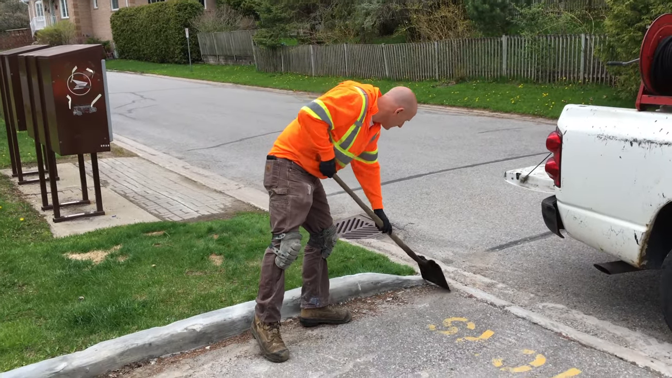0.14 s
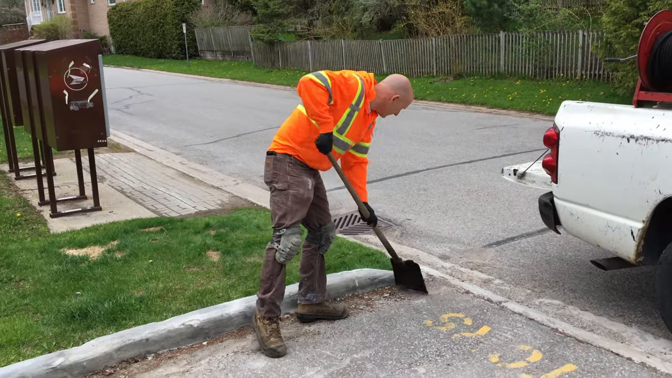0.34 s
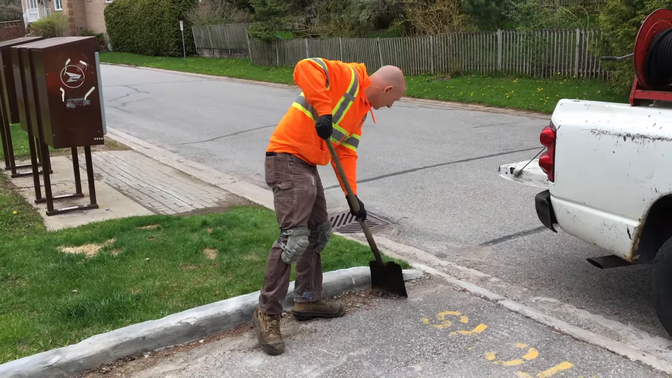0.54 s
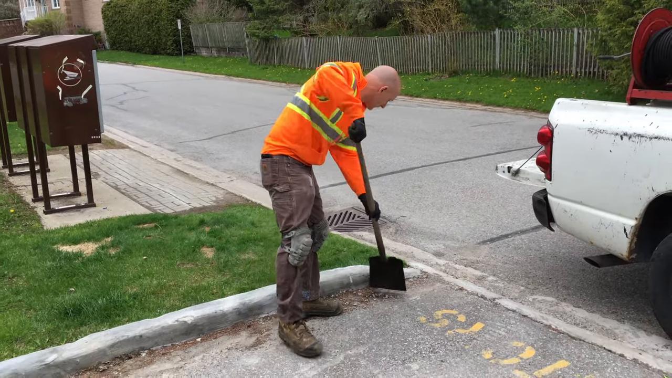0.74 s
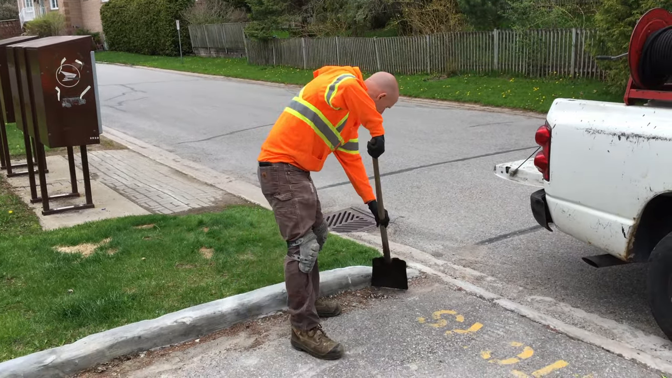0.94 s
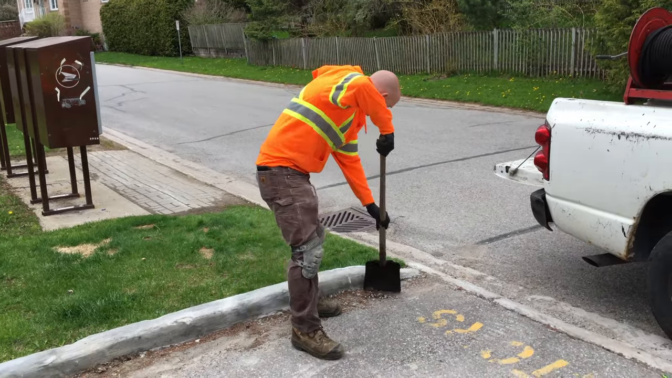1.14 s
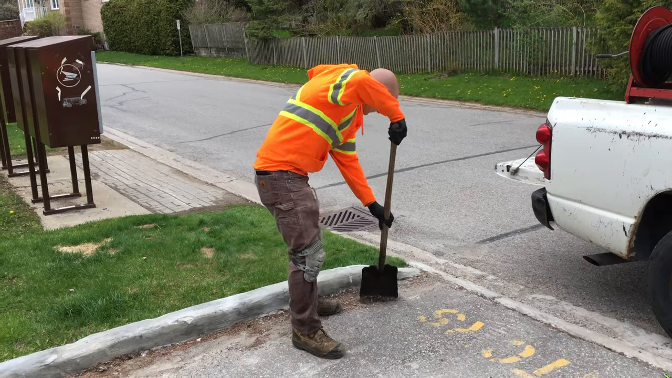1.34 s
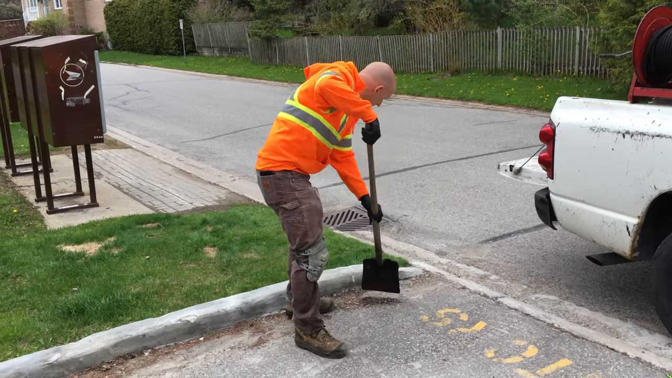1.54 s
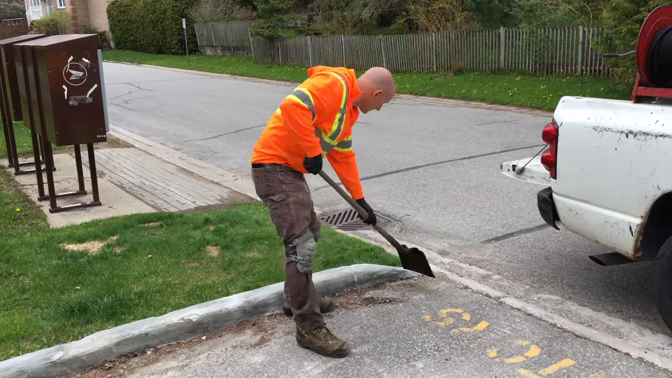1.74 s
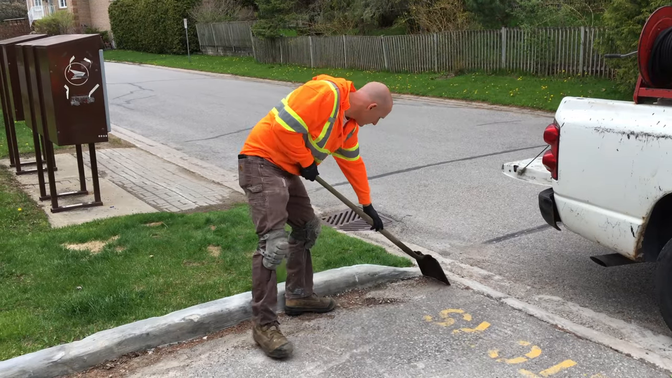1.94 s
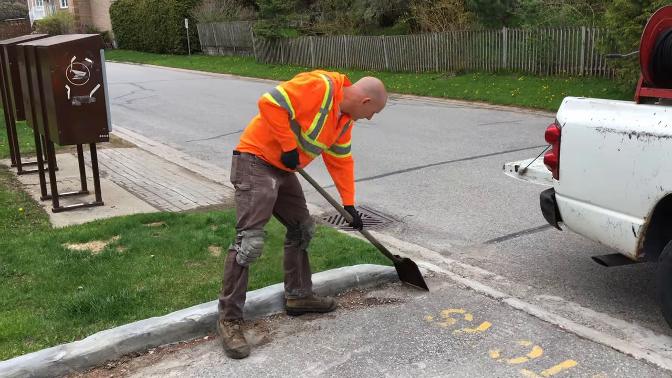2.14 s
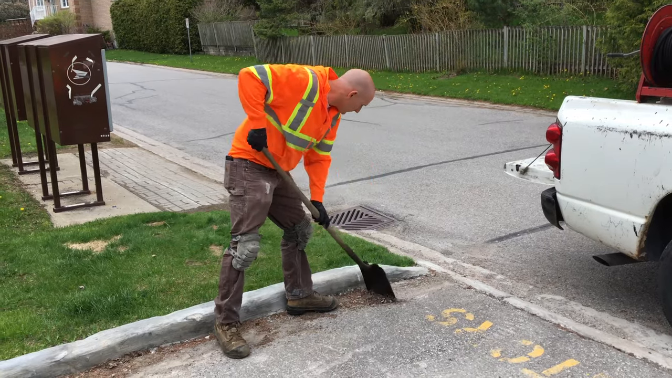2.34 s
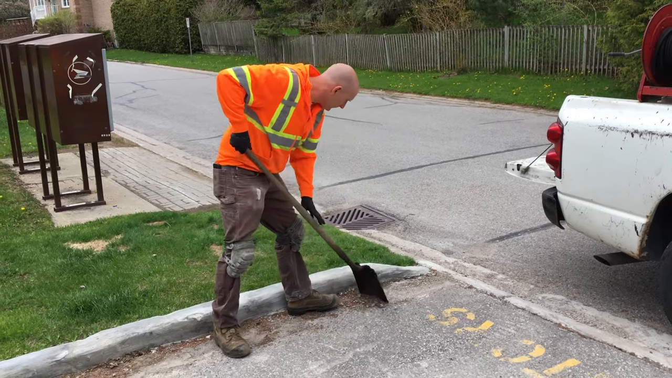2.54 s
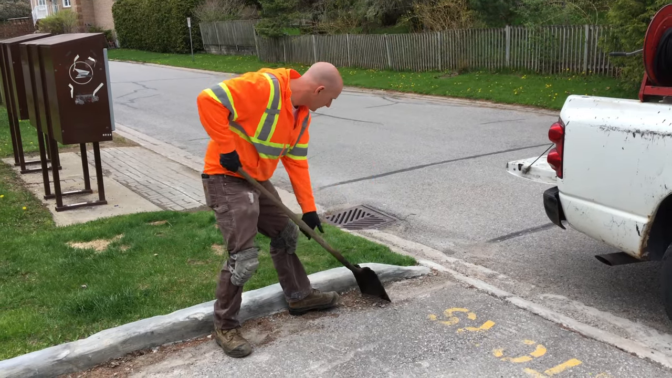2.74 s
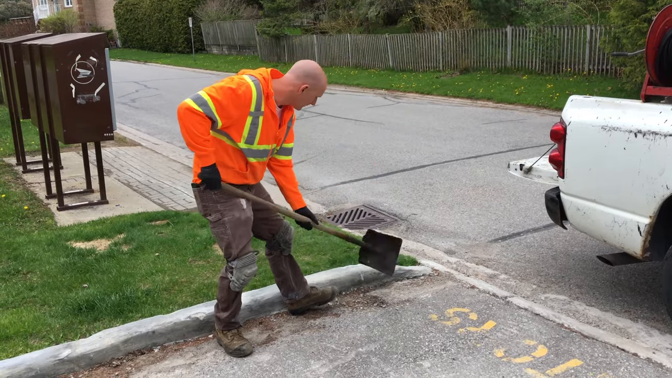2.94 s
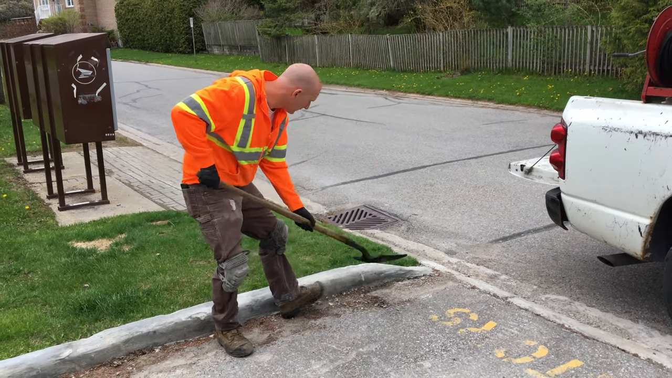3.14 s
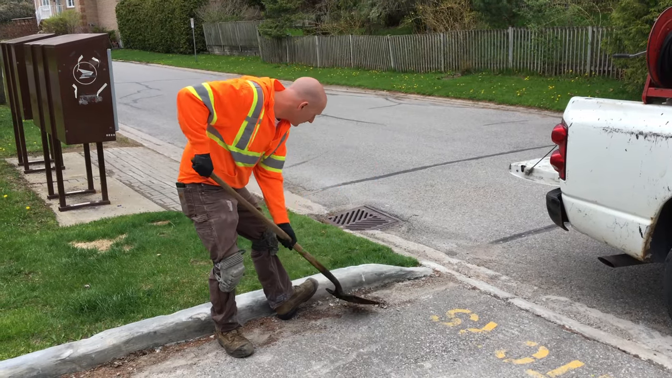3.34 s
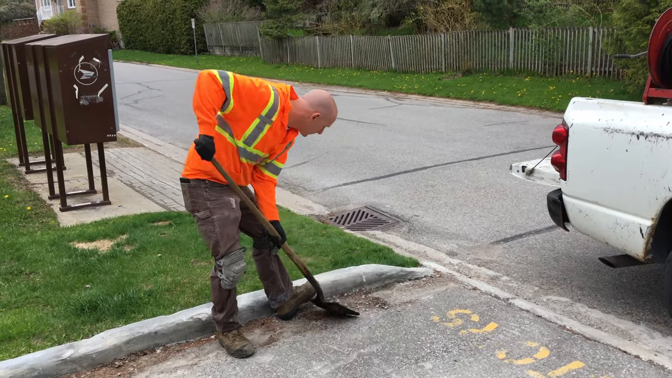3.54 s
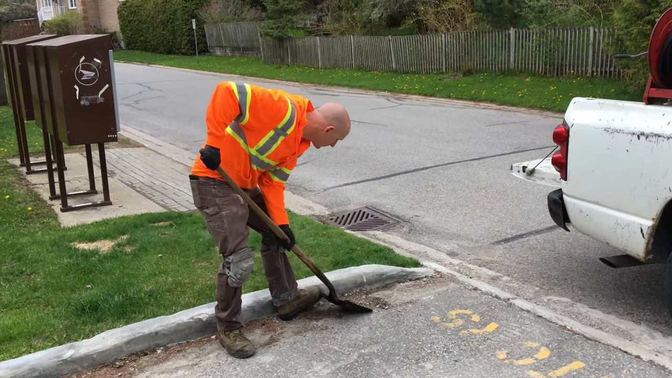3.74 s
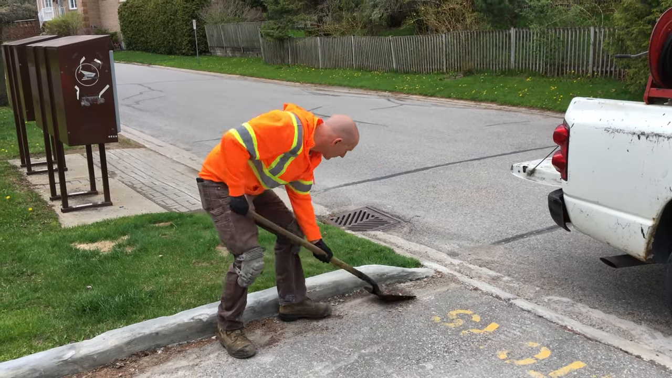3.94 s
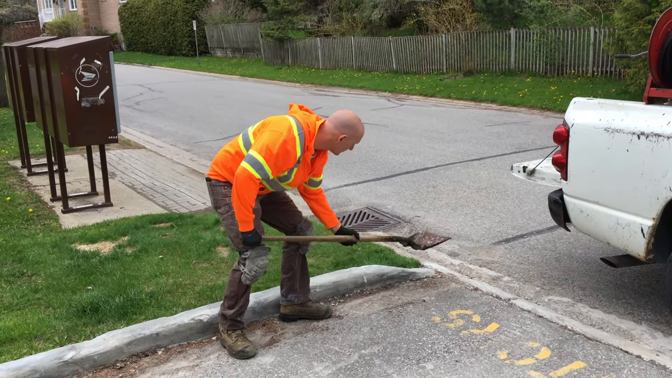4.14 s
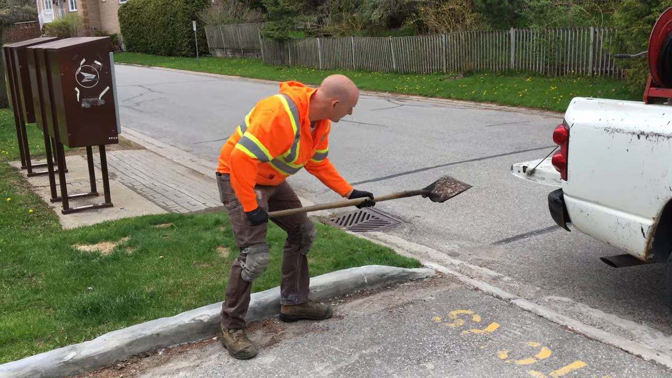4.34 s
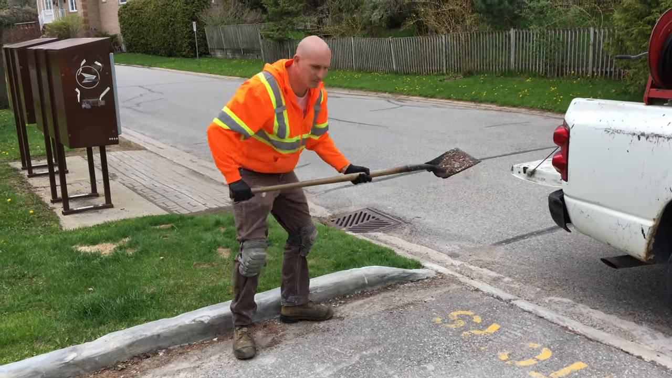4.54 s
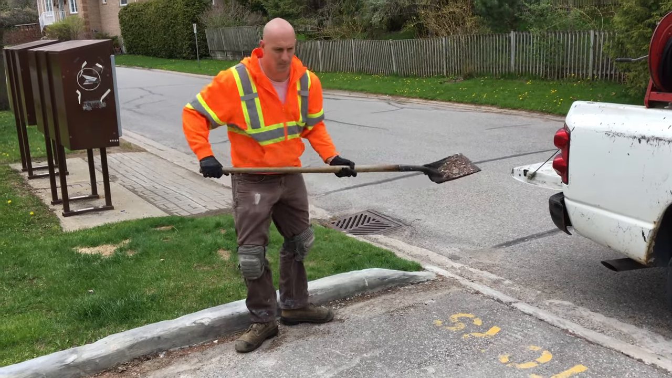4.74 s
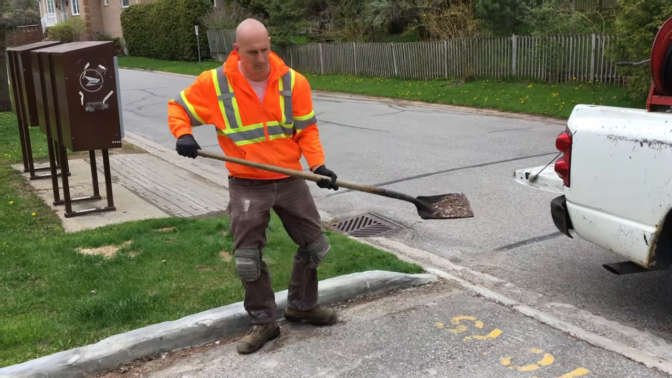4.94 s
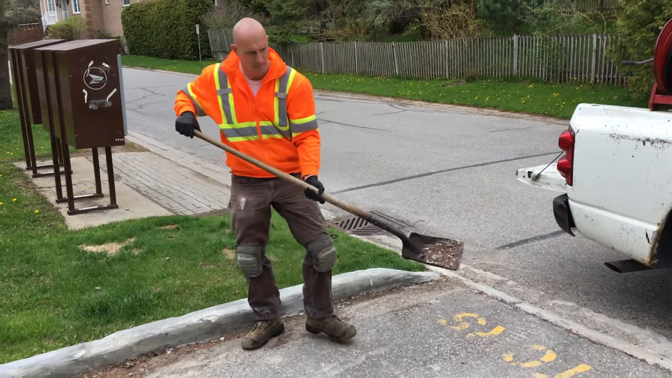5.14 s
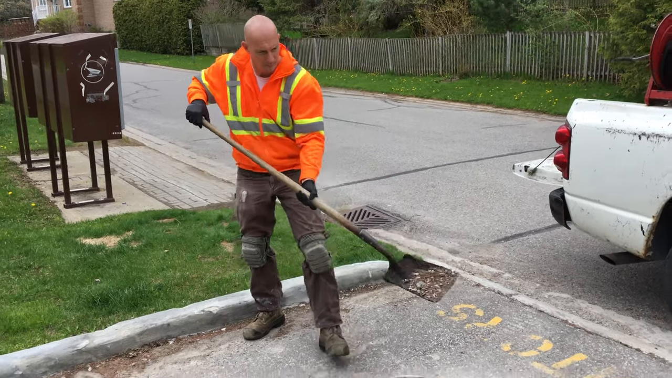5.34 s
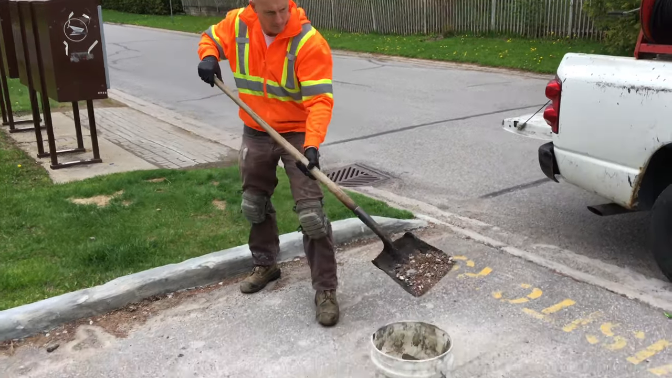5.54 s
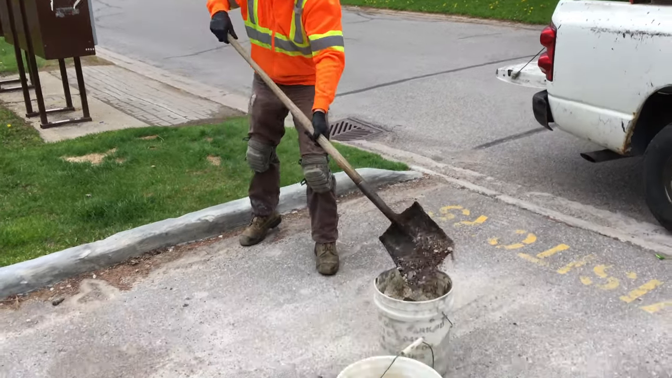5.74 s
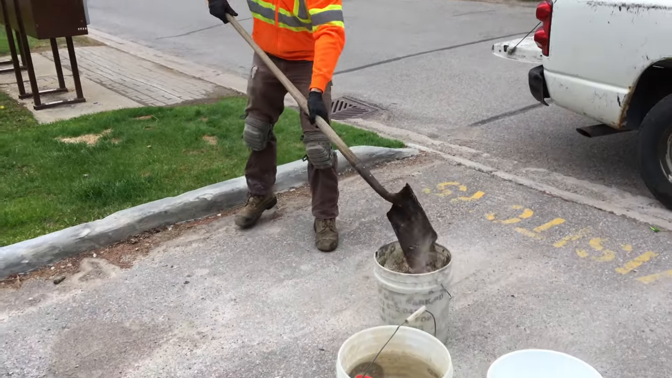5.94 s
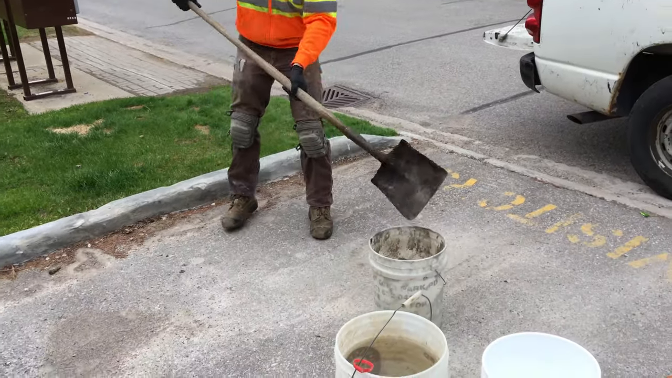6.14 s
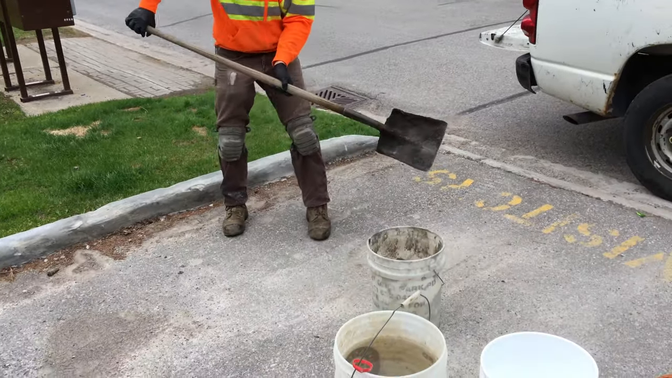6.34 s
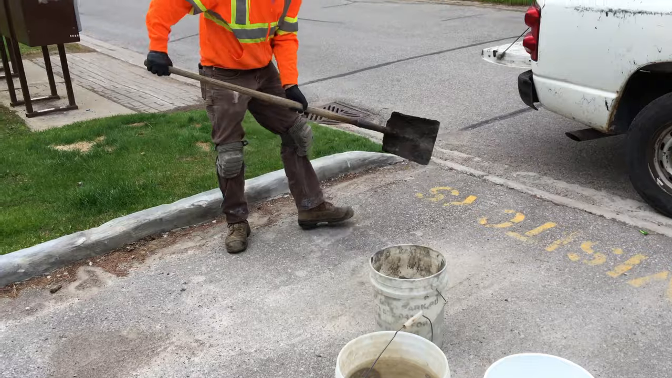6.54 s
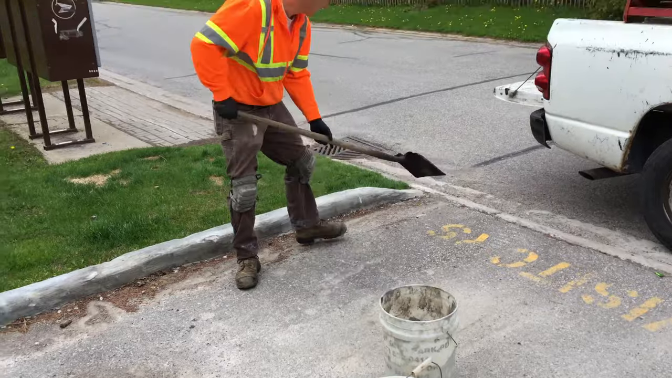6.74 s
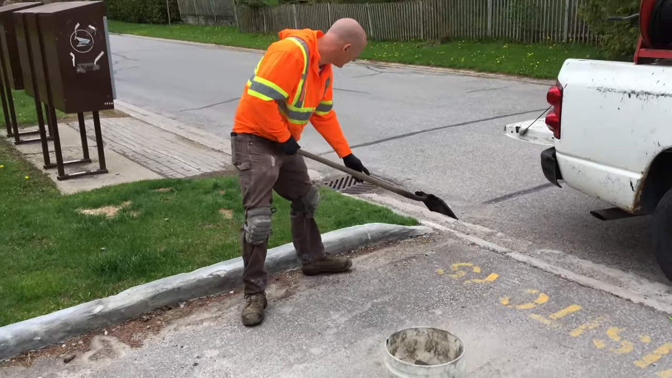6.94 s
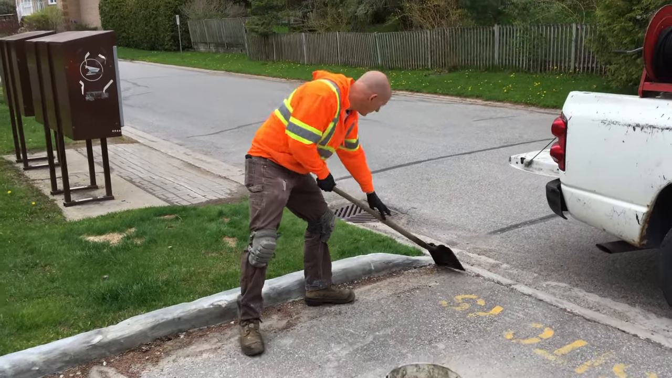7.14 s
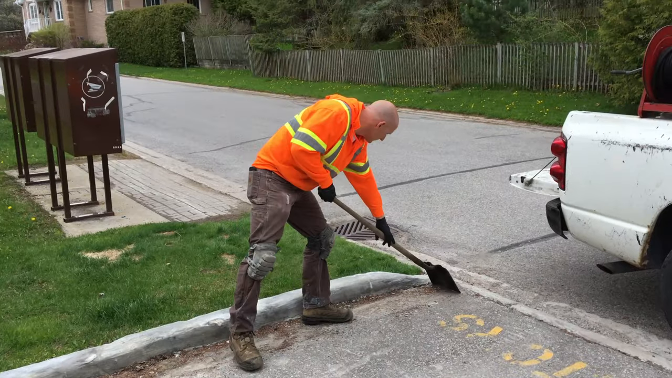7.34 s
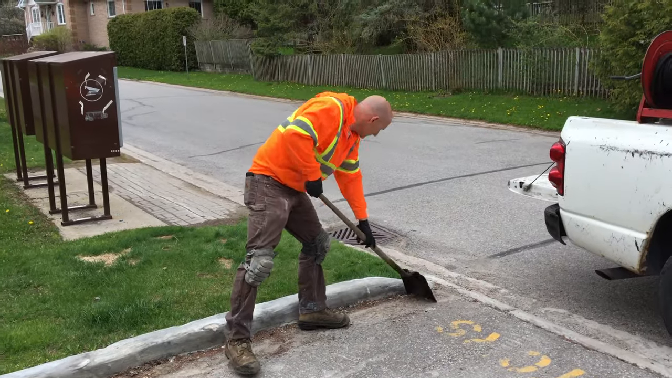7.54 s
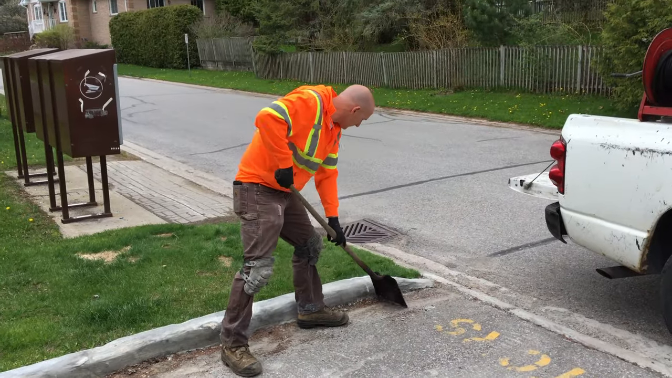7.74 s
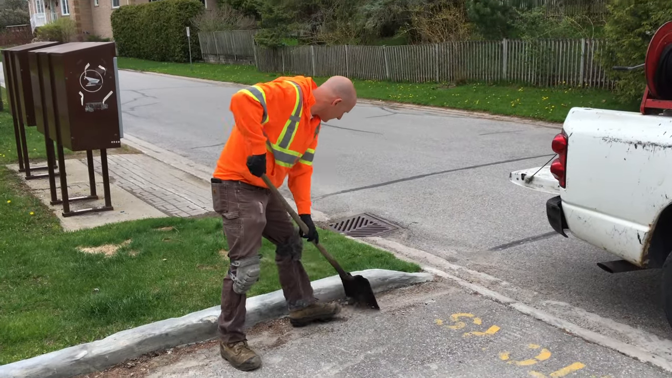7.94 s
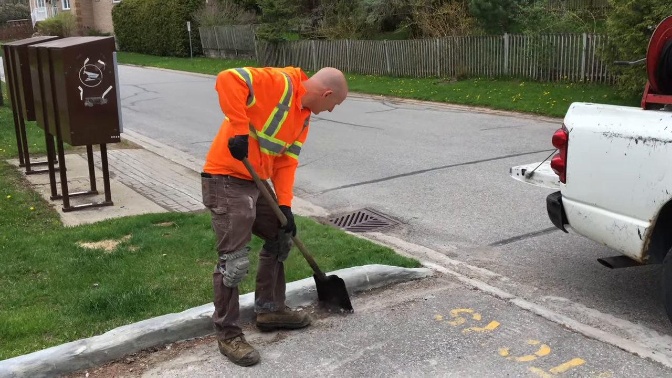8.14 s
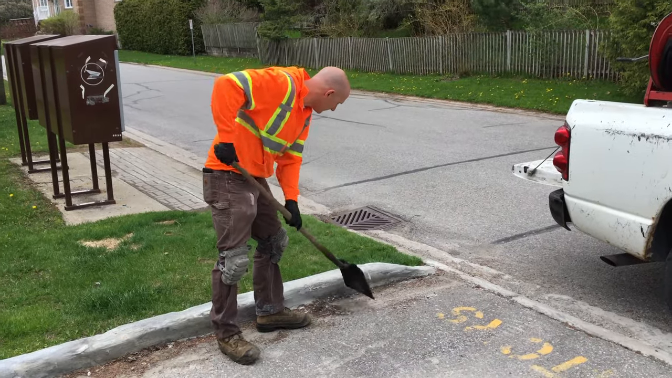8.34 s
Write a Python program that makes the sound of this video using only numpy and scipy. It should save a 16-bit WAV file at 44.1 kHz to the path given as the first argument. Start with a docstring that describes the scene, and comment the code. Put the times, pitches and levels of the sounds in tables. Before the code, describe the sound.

Close, dry outdoor street sound in mono: a steel shovel makes three rough drags over gritty asphalt, with a brief touch between the first two, clanking on stones. Wind buffets the microphone, the blade shoves under the dirt in a sharp crunchy scoop, boots tick on pebbles, then the load hisses and thumps into a plastic bucket. Faint birds chirp; one longer, softer scrape ends it.

```python
"""Outdoors, on a street: a steel shovel drags grit over asphalt four times, with one brief extra touch.
After three drags it scoops; the load slides into a plastic bucket before the last drag.
The edge catches and slips on stones: pulse trains and noise bursts shake shaft, blade and cracking grains.
Dirt drives plastic modes and an air boom; boots and pebbles tick as short noise bursts.
Wind is gusted noise, far birds are swept sines, and echoes are sparse decaying taps; one microphone."""
import sys
import numpy as np
from scipy import signal
from scipy.io import wavfile
from scipy.ndimage import uniform_filter1d

SR = 44100
rng = np.random.default_rng(int(sys.argv[2]) if len(sys.argv) > 2 else 0)


def wrap_up_sound(samples):
    """Save the sound to the file named by the first command line argument, as 16-bit audio."""
    columns = np.atleast_2d(samples).T
    # keep every value between -1 and 1, then stretch to whole-number steps
    tamed = np.clip(columns, -1, 1)
    steps = np.round(tamed * 32767).astype(np.int16)
    wavfile.write(sys.argv[1], SR, steps)


N = 370440
TIME = np.arange(N) / SR
HZ = np.fft.rfftfreq(8192, 1 / SR)


# blade dragged on its edge: (start [s], push [s], hold [s], release [s], pressure [dB],
# first touch [dB re pressure], sag over hold [dB], judder [dB re pressure], crushing [dB re pressure])
DRAG_STROKES = [(0.086, 0.24, 0.25, 0.13, -16.5, -12, -6.5, -6, -5),
                (0.914, 0.019, 0.041, 0.022, -25, -0.5, -1, -8.5, -7.5),
                (1.105, 0.17, 0.19, 0.094, -17, -21, -8, -5.5, -3.5),
                (2.023, .24, .28, 0.039, -15, -13.5, -8, -8.5, -4),
                (7.325, 0.24, 0.66, 0.1, -20.5, -22, -2, -4, -1)]
# blade lands or jumps off a stone: (time [s], ring [dB], thud [dB], crack [dB])
EDGE_KNOCKS = [(0.072, -12, -11.5, -22.5), (0.082, -35, -19, -22.5), (0.1198, -17.5, -38, -16),
               (.294, -12, -22, -22), (.311, -17, -28.5, -16), (.337, -12.5, -8, -27), (.43, -17, -27, -16),
               (.489, -12.5, -16, -15), (.94, -32, -36, -34.5), (1.051, -21.5, -22, -29.5),
               (1.226, -33, -32, -10.5), (1.249, -20, -24, -27), (1.259, -12, -33, -27),
               (1.3158, -19, -45, -10.5), (2.004, -20.5, -24, -19.5), (2.013, -19.5, -25, -32),
               (2.065, -34, -62, -19), (2.158, -8.5, -14, -14.5), (2.193, -23, -29, -18),
               (2.2178, -11, -30, -32), (2.2751, -8, -17.5, -17), (2.402, -12.5, -21, -32.5),
               (2.529, -28, -40, -15.5), (2.543, -27, -35, -14.5), (7.2501, -18, -16.5, -17),
               (7.262, -16.5, -18.5, -22.5), (7.334, -28.5, -24, -33.5), (7.619, -16, -14, -38),
               (7.673, -12.5, -16, -33), (7.851, -14.5, -24, -40)]
# broad colour of the blade on its edge: (frequency [Hz], density [dB per Hz])
EDGE_COLOUR = [(60, -24), (110, 4.5), (160, -3), (300, 5), (430, -5.5), (560, 5), (1200, 3.5), (1500, -2),
               (2050, 4.5), (3200, -2.5), (4900, -10), (6500, 2), (10500, -34), (16000, -46.5)]
# nominal modes of the steel blade, also rung by scoops(): (frequency [Hz], level [dB], t60 [s])
BLADE_MODES = [(287, -1.5, 0.023), (655.4, 3.5, 0.033), (804, -3, 0.059), (1153, -1, 0.063),
               (1242, 3, 0.067), (1447, -3, 0.023), (1777, 3.5, .06), (1928, 0, 0.072), (2055, 3.5, 0.053),
               (2167, -4, .05), (2676, -1.5, .04), (4233, 10.5, 0.055), (5730, -6, 0.033), (6900, -17, .03)]


def drags():
    """The blade scrapes on its edge: five contact spots ring with the steel modes."""
    spots = [body(EDGE_COLOUR, BLADE_MODES, ring_db=1.0) for _ in range(5)]
    return shovel(DRAG_STROKES, EDGE_KNOCKS, spots, judder_db=-4.0, ring_db=-1.45, grit_db=-1.07)


# flat blade skids on landing, touches again, is shoved under the heap in two pushes:
# (start [s], push [s], hold [s], release [s], pressure [dB],
# first touch [dB re pressure], sag over hold [dB], judder [dB re pressure], crushing [dB re pressure])
SCOOP_STROKES = [(3.529, .004, 0.027, 0.017, -27, 2, -3, -11, -13),
                 (3.667, 0.0054, 0.022, 0.033, -33, -9, -3, -9, -12.5),
                 (3.709, 0.17, 0.048, 0.14, -14, -12.5, -7, -15.5, -8.5),
                 (3.925, 0.026, 0.06, 0.027, -18, -17, -2, -30, -6.5)]
# flat of the blade strikes the road: (time [s], ring [dB], thud [dB], crack [dB])
FLAT_SLAPS = [(3.5305, -23, -44, -33), (3.554, -22.5, -46, -30.5), (3.994, -15, -46, -16.5)]
# broad colour of the blade lying flat: (frequency [Hz], density [dB per Hz])
FLAT_COLOUR = [(100, -65.5), (300, 9), (430, -11.5), (600, -1), (900, -7), (1150, 1), (1900, 1),
               (2600, -1.5), (3200, -11.5), (4900, 5), (6000, -29), (10500, -29), (13000, -25),
               (16000, -25)]


def scoops():
    """The blade skids lying flat, its modes weaker against the broad colour than on edge."""
    spots = [body(FLAT_COLOUR, BLADE_MODES, ring_db=-6) for _ in range(4)]
    return shovel(SCOOP_STROKES, FLAT_SLAPS, spots, judder_db=-3.5, ring_db=-0.2, grit_db=4.2)


# edge squeaks thinly on smooth stone: (start [s], push [s], hold [s], release [s],
# level [dB], first touch [dB re level], sag over hold [dB])
SQUEAK_STROKE = (.15, .045, .125, .07, -22.5, -12, 0)


def squeak():
    """Rapid slips sound out a narrow high band."""
    return sing(stroke(*SQUEAK_STROKE), centre_hz=12550, width_hz=1600, steady=0.05)


GROAN_DB = -12.5  # re pressure
UPRIGHT_STROKE = 2  # row of DRAG_STROKES made with the shovel upright


def groan():
    """The upright blade groans: slips sound out one low resonance."""
    pressure = stroke(*DRAG_STROKES[UPRIGHT_STROKE][:-2])
    return sing(amp(GROAN_DB) * pressure, centre_hz=602, width_hz=72, steady=0.67)


def shovel(strokes, knocks, spots, judder_db, ring_db, grit_db):
    """Slips and knocks shake the shaft, ring the blade and crush grit under the edge."""
    s, knock_db, thud_db, crack_db = np.transpose(knocks)
    pressure, judder, crush = contact(strokes, s)
    slip = slips(per_s=230, decay_s=0.0084, spread_db=1.5, steady=0.17)
    chips = slips(per_s=380, decay_s=0.0005, spread_db=2.5, steady=0.36)

    low = amp(judder_db) * judder * slip * grains(1500, 0.93)
    low += crunches(s, thud_db, decay_s=0.0035)
    mid = amp(ring_db) * pressure * slip * grains(4000, 2.3)
    mid += crunches(s, knock_db, decay_s=0.0061)
    high = amp(grit_db) * crush * np.sqrt(slip) * chips * rng.standard_normal(N)
    high += crunches(s, crack_db, decay_s=0.0047)

    shaft = unit(band(spots[0], [122, 440], "band", order=4))
    blade = [unit(band(spot, [490, 3200], "band", order=4)) for spot in spots]
    stones = [stone(uneven_db=4.0, ring_db=-7.5) for _ in range(10)]
    return through(low, shaft) + roaming(mid, blade, rate_hz=16) + roaming(high, stones, rate_hz=50)


HEAP_JUDDER_DB, HEAP_GRIT_DB = 0.5, 1.5  # growth over a stroke, as dirt piles up before the blade
CATCH_DB, CATCH_LEAD_S, CATCH_S = -1.5, 0.012, 0.009  # edge stalls on a stone just before it jumps


def contact(strokes, knock_times):
    """Pressure on the edge and the judder and crushing it drives; all three dip just before a knock."""
    pressure, judder, crush = np.zeros((3, N))
    for *push, judder_db, grit_db in strokes:
        start, push_s, hold_s = push[:3]
        force = stroke(*push)
        heap = np.clip((TIME - start) / (push_s + hold_s), 0, 1) - 0.5
        pressure += force
        judder += force * amp(judder_db + HEAP_JUDDER_DB * heap)
        crush += force * amp(grit_db + HEAP_GRIT_DB * heap)
    offsets = [(TIME - s + CATCH_LEAD_S) / CATCH_S for s in knock_times]
    caught = np.max([np.exp(-np.minimum(offset ** 2, 20)) for offset in offsets], axis=0)
    return np.array([pressure, judder, crush]) * amp(CATCH_DB * caught)


PUSH_EASE = 1.15  # above 1: force builds fast, then levels off
LIFT_DB = -31  # pressure fall per release time as the blade lifts


def stroke(start, push_s, hold_s, release_s, db, touch_db, sag_db):
    """Force of one arm stroke: builds from the first touch, sags as the arm runs out, lifts."""
    t = TIME - start
    building = np.clip(1 - t / push_s, 0, 1) ** PUSH_EASE
    tiring = np.clip((t - push_s) / hold_s, 0, 1) ** 2
    lifting = np.minimum(np.maximum(t - push_s - hold_s, 0) / release_s, 10)
    return (t >= 0) * amp(db + touch_db * building + sag_db * tiring + LIFT_DB * lifting)


def slips(per_s, decay_s, spread_db, steady):
    """Stick and slip: the edge lets go at uneven moments, each release a sharp surge that fades."""
    t = np.arange(SR // 20) / SR
    surge = evened(through(grains(per_s, spread_db) ** 2, np.exp(-t / decay_s)))
    power = abs(surge) + abs(steady)
    return np.sqrt(power / uniform_filter1d(power, size=3000))  # arm holds the mean force steady


def sing(gain, centre_hz, width_hz, steady):
    """Rapid slips lock onto one resonance of the steel: slip-gated noise through a narrow band."""
    drive = slips(per_s=300, decay_s=0.0014, spread_db=-1.5, steady=steady) * rng.standard_normal(N)
    edges_hz = [centre_hz - width_hz / 2, centre_hz + width_hz / 2]
    return gain * evened(band(drive, edges_hz, "band", order=2))


# stone being crushed, also the treble of loose_dirt(): (frequency [Hz], density [dB per Hz])
GRIT_COLOUR = [(2000, -26.5), (3300, 3.5), (4200, 0.5), (4900, -4.5), (5700, 3), (7000, 0.5), (7900, -4),
               (9300, 0), (10500, -5), (12300, -1), (14000, -6), (16000, -10.5)]


def stone(uneven_db, ring_db):
    """Every stone cracks with a colour of its own and pings briefly at three pitches."""
    crack = colour([(hz, db + uneven_db * rng.uniform(-1, 1)) for hz, db in GRIT_COLOUR])
    t = np.arange(len(crack)) / SR
    ping = sum(np.sin(2 * np.pi * hz * t) for hz in rng.uniform(3300, 9500, size=3))
    return unit(crack + amp(ring_db) * unit(ping * np.exp(-t / 0.0016)))


# load slides off as a trickle around one slump: (loudest time [s], level [dB], rise [s], fall [s])
POUR_SWELLS = [(6.02, -36, 0.16, 0.19), (6.029, -19, 0.041, 0.033)]
# sand hiss: (frequency [Hz], density [dB per Hz])
SAND_COLOUR = [(1200, 6.5), (2900, 2), (4500, -3), (7000, -2), (9000, -6.5), (13000, -1), (16000, -10)]
# dirt lands, the bulk then last crumbs: (loudest time [s], level [dB], rise [s], fall [s])
LANDING_SWELLS = [(6.045, -21, 0.028, 0.041), (6.16, -47, 0.033, 0.13)]
# stones and clods hit the bucket: (time [s], wall [dB], boom of the air inside [dB])
CLOD_HITS = [(5.908, -27, -25), (5.929, -12.5, -29), (5.946, -13, -40), (5.98, -28, -23),
             (6.0233, -8.5, -30), (6.042, -12.5, -15.5), (6.051, -11, -11), (6.069, -13.5, -18),
             (6.089, -16, -13), (6.152, -25, -22), (6.209, -37, -21.5), (6.245, -29.5, -26.5),
             (6.355, -36, -33)]
# nominal modes of plastic wall and bottom: (frequency [Hz], level [dB], t60 [s])
BUCKET_MODES = [(570, -2.5, 0.076), (724, -4.5, 0.11), (802, 0, 0.063), (906, 0, 0.069), (1330, 1, 0.08),
                (1600, -7, 0.14), (1814, -6.5, 0.12), (2220, -1.5, 0.094), (2870, -10, 0.046)]
# dull knock of the plastic: (frequency [Hz], density [dB per Hz])
PLASTIC_COLOUR = [(120, -17), (310, 5), (430, -10), (650, 13), (1400, 13.5), (2800, 0.5), (5000, -12)]
SAND_SPREAD_DB = 4


def bucket():
    """Sand hisses off the blade; dirt and stones drum on the plastic and make the air inside boom."""
    at, wall_db, boom_db = np.transpose(CLOD_HITS)
    clumps = slips(per_s=110, decay_s=0.002, spread_db=2.5, steady=0.27)
    hiss = sum(swell(*row) for row in POUR_SWELLS) * clumps * grains(14000, SAND_SPREAD_DB)
    spray = amp(-14.5) * crunches(at, wall_db, decay_s=0.0051)  # each clod bursts into sand

    blows = sum(swell(*row) for row in LANDING_SWELLS) * clumps * grains(1200, 2.0)
    blows += crunches(at, wall_db, decay_s=0.0026)
    spots = [body(PLASTIC_COLOUR, BUCKET_MODES, ring_db=-2.0) for _ in range(5)]
    walls = roaming(blows, spots, rate_hz=24)

    air, t = np.zeros(N), np.arange(SR // 2) / SR
    for start, db in zip(at, boom_db):
        hz = 207 * rng.uniform(0.866, 1.04)
        add(air, start, amp(db) * boom(t, hz, decay_s=0.018, rise_s=0.0016))
    return through(hiss + spray, colour(SAND_COLOUR)) + walls + amp(-3) * air


def boom(t, hz, decay_s, rise_s):
    """Air column of the open bucket: a sine that rises fast and decays."""
    return np.sin(2 * np.pi * hz * t) * (np.exp(-t / decay_s) - np.exp(-t / rise_s))


# boots on grit and loose pebbles: (time [s], level [dB], treble [dB re level])
DIRT_TICKS = [(1.739, -25.5, -24), (1.825, -34.5, -17), (2.747, -32, -12.5), (3.267, -31, -20),
              (4.587, -34, -16.5), (4.779, -19.5, -13.5), (4.81, -22, -21), (4.897, -28, -30),
              (4.912, -34, -20), (4.973, -27.5, -27), (4.984, -26, -24), (5.173, -36, -24),
              (5.268, -36.5, -12), (5.714, -31, -31), (6.208, -34, -1), (6.377, -38, 2), (6.407, -40, -3),
              (6.517, -31, -8.5), (6.686, -43.5, -4.5), (6.847, -33, -17), (7.147, -27.5, -16)]
# nominal tick colour: (frequency [Hz], density [dB per Hz])
TICK_COLOUR = [(200, 1), (800, 3), (1800, 8), (3000, 0.5), (9000, -32)]
# crackle of shifting sand: (frequency [Hz], density [dB per Hz])
DIRT_COLOUR = [(200, 1.5), (430, -1), (700, 3.5), (2100, -1.5), (3200, -4), (5000, -9.5), (7000, -12),
               (10000, -10.5), (13000, -10), (16000, -16.5)]
TICK_DECAY_S, SKID_DECAY_S = 0.0018, 0.013


def loose_dirt():
    """Pebbles tick and skid briefly over a fine crackle of shifting sand."""
    s, db, treble_db = np.transpose(DIRT_TICKS)
    taps = crunches(s, db, TICK_DECAY_S) + amp(-9.5) * crunches(s, db, SKID_DECAY_S)
    spots = [colour([(hz, level_db + 4 * rng.uniform(-0.45, 1)) for hz, level_db in TICK_COLOUR])
             for _ in range(4)]
    ticks = amp(-9) * roaming(taps, spots, rate_hz=10)
    ticks += amp(-1) * through(crunches(s, db + treble_db, decay_s=0.0063), colour(GRIT_COLOUR))
    crackle = shifting() * evened(grains(3000, 2.0) * amp(1.9 * wander(37)))
    return ticks + amp(-2.5) * through(crackle, colour(DIRT_COLOUR))


SETTLE_DB, SETTLE_RISE_S, SETTLE_S = -47.5, 0.016, 0.52
WALK_FROM_S, WALK_TO_S, WALK_DB = 4.5, 8.4, -57  # boots shuffle to the bucket and back


def shifting():
    """Loose-dirt motion: settles after each drag and the last scoop push, stirs under the boots."""
    lifts = [sum(row[:4]) for row in DRAG_STROKES + SCOOP_STROKES[-1:]]
    settling = np.max([swell(s, SETTLE_DB, SETTLE_RISE_S, SETTLE_S) for s in lifts], axis=0)
    walking = amp(WALK_DB) * (TIME > WALK_FROM_S) * (TIME < WALK_TO_S)
    return np.hypot(settling, walking)


# eddies hit the microphone: (loudest time [s], level [dB], length [s])
WIND_GUSTS = [(1.592, -33, 0.064), (1.867, -32, 0.03), (2.852, -37.5, 0.073), (3.146, -21, 0.046),
              (3.24, -24.5, 0.11), (3.314, -25.5, 0.061), (3.403, -27.5, 0.064), (3.48, -22.5, 0.035),
              (3.608, -23.5, 0.049), (4.228, -32, 0.032), (4.538, -29, .03), (4.594, -28.5, 0.029)]
BREEZE_DB = -46.5
GUST_RISE, GUST_FALL = 0.46, 1  # shares of a gust's length


def wind():
    """Eddies thump on the microphone; the stronger the gust, the higher they reach."""
    eddies = np.max([swell(s, db, GUST_RISE * length_s, GUST_FALL * length_s)
                     for s, db, length_s in WIND_GUSTS], axis=0)
    gust = np.hypot(amp(BREEZE_DB), eddies) * amp(2.62 * wander(30) - 1)
    # colours: (frequency [Hz], density [dB per Hz])
    rumble_colour = colour([(40, 7), (70, 4.5), (120, -4), (200, -18), (400, -30.5), (5000, -92)])
    buffet_colour = colour([(80, -3.5), (160, 3.5), (260, -3.0), (450, -19.5), (4000, -78)])
    rumble = through(rng.standard_normal(N), rumble_colour)
    buffet = through(rng.standard_normal(N), buffet_colour)
    return gust * rumble + amp(21) * gust ** 2 * buffet


# distant bird's three-note figure: (delay [s], start [Hz], end [Hz], level [dB]), before SONG_TIMES scaling
SONG_FIGURE = [(0, 2970, 3570, -5), (0.078, 4030, 4760, -2), (0.179, 5950, 4950, -0.5)]
# each time it is sung: (time [s], level [dB], pitch ratio [1])
SONG_TIMES = [(5.201, -53.5, 1.01), (5.5, -52, 1), (6.405, -52.5, 1), (6.715, -53, 1.005),
              (7.04, -53.5, 1.06)]
# single slurs from other birds: (time [s], start [Hz], end [Hz], level [dB])
BIRD_SLURS = [(0, 3680, 4250, -53.5), (2.84, 4160, 3900, -61), (4.66, 5760, 4640, -70),
              (5.087, 6420, 5760, -56.5), (6.44, 6500, 5850, -54), (6.59, 4630, 3920, -54)]
SLUR_S, BIRD_ECHO_S = 0.062, 0.33


def birds(length_s):
    """Quick wavering swept sines, scattered by trees and houses."""
    out, waver = np.zeros(N), wander(260)
    u = np.linspace(0, 1, int(length_s * SR))
    song = [(s + delay, ratio * start_hz, ratio * end_hz, db + note_db)
            for s, db, ratio in SONG_TIMES
            for delay, start_hz, end_hz, note_db in SONG_FIGURE]
    for s, start_hz, end_hz, db in song + BIRD_SLURS:
        burr = 0.016 if end_hz > start_hz else 0.06  # falling slurs waver more
        glide_hz = start_hz + (end_hz - start_hz) * u
        hz = glide_hz * (1 + burr * np.roll(waver, -int(s * SR))[:len(u)])
        add(out, s, amp(db) * np.sin(np.pi * u) * np.sin(2 * np.pi * np.cumsum(hz) / SR))
    return amp(1) * (out + amp(-2) * through(out, street(t60=BIRD_ECHO_S)))


# far-off air: (frequency [Hz], density [dB per Hz])
AIR_COLOUR = [(59, -21), (100, 4.5), (452, -22.5), (621, -21), (3620, -28), (4870, -37), (6150, -26),
              (7770, -50), (14400, -38), (16000, -22)]


def far_air():
    """Steady coloured noise of the open air."""
    return amp(-54.5) * through(rng.standard_normal(N), colour(AIR_COLOUR))


def street(t60):
    """Thin scattered echoes from the truck, fence and trees, duller than the direct sound."""
    t = np.arange(SR) / SR
    taps = rng.choice([-1, 1], SR) * (rng.random(SR) < 2500 / SR) * (t > 0.012)
    return unit(band(taps * amp(-60 * t / t60), 5000, "low", order=1))


def body(points, modes, ring_db):
    """Response to a blow at one spot: a coloured click plus modes, weighted and detuned by the contact."""
    t, ring = np.arange(SR // 5) / SR, 0
    contacts = rng.uniform(-1.32, 1, (len(modes), 2))
    for (hz, db, t60), (pull, weight) in zip(modes, contacts):
        tone = np.sin(2 * np.pi * hz * (1 + 0.025 * pull) * t)
        ring += amp(db + 5 * weight) * unit(amp(-60 * t / t60) * tone)
    response = amp(ring_db) * unit(ring)
    add(response, 0, colour(points))
    return unit(response)


def roaming(drive, responses, rate_hz):
    """The point of contact moves: the drive passes from one spot's response to another's."""
    knots = np.arange(0, N / SR + 1, 0.5 / rate_hz)
    visited = rng.integers(0, len(responses), len(knots))
    return sum(through(drive * np.interp(TIME, knots, visited == k), response)
               for k, response in enumerate(responses))


def crunches(times, dbs, decay_s):
    """Each contact is a burst of tiny fractures (noise) that builds and dies within milliseconds."""
    out, t = np.zeros(N), np.arange(SR // 10) / SR
    shape = np.exp(-t / decay_s) * (1 - np.exp(-t / (0.16 * decay_s)))
    for s, db in zip(times, dbs):
        add(out, s, amp(db) * shape / shape.max() * rng.standard_normal(len(t)))
    return out


def grains(per_s, spread_db):
    """Random clicks of uneven size and either sign, at rms 1."""
    size = amp(spread_db * np.minimum(rng.exponential(1, N), 4))
    return evened(size * rng.choice([-1, 1], N) * (rng.random(N) < per_s / SR))


def swell(s, db, rise_s, fall_s):
    """Gain that grows exponentially to its peak at time s, then dies away."""
    return amp(db) * np.exp(-np.minimum(np.maximum((s - TIME) / rise_s, (TIME - s) / fall_s), 20))


def wander(rate_hz):
    """Smooth noise of rms 1 that moves up to about the given rate."""
    return evened(band(rng.standard_normal(N), rate_hz, "low", order=2))


def colour(points):
    """Minimum-phase click with this spectrum, rolled off below the first point; energy 1."""
    hz, db = np.transpose(points)
    log_gain = np.log(amp(np.interp(np.log(HZ + 1), np.log(hz), db)))
    log_gain -= np.log1p((hz[0] / (HZ + 1)) ** 2)
    circle = np.concatenate([log_gain, log_gain[-2:0:-1]])
    spectrum = np.exp(np.conj(signal.hilbert(circle)))
    return unit(np.fft.ifft(spectrum).real[:len(HZ)])


def band(x, edges_hz, kind, order=3):
    """Causal Butterworth filter."""
    return signal.sosfilt(signal.butter(order, edges_hz, kind, fs=SR, output="sos"), x)


def through(x, response):
    """Plays x through an impulse response."""
    return signal.oaconvolve(x, response)[:N]


def add(mix, s, sound):
    """Lays a sound into the mix at time s."""
    part = mix[max(round(s * SR), 0):][:len(sound)]
    part += sound[:len(part)]


def amp(db):
    """Decibels to gain."""
    return 10 ** (np.asarray(db) / 20)


def evened(x):
    """Scaled to rms 1."""
    return x / np.sqrt(np.mean(x ** 2) + 1e-20)


def unit(x):
    """Scaled to energy 1."""
    return x / np.linalg.norm(x)


def scene():
    """Shovel, bucket and dirt with street echoes, then wind, birds and far-off air."""
    work = drags() + scoops() + squeak() + groan() + bucket() + loose_dirt()
    echoes = amp(-21.5) * through(work, street(t60=0.33))
    mono = work + echoes + wind() + birds(length_s=SLUR_S) + far_air()
    return np.array([mono, mono])


CEILING, EDGE_HZ = 0.93, 15950  # full scale = 1; band limit


def record(dry):
    """The microphone drops the deepest rumble and rounds off peaks near full scale; then the band limit."""
    thinned = band(dry, 36, "high", order=3)
    rounded = thinned / (1 + abs(thinned / CEILING) ** 6) ** (1 / 6)
    lowpass = signal.firwin(511, EDGE_HZ, window=("kaiser", 9), fs=SR)
    return signal.oaconvolve(rounded, lowpass[None], "same")


dry = scene()
out = record(dry)
wrap_up_sound(out)
```